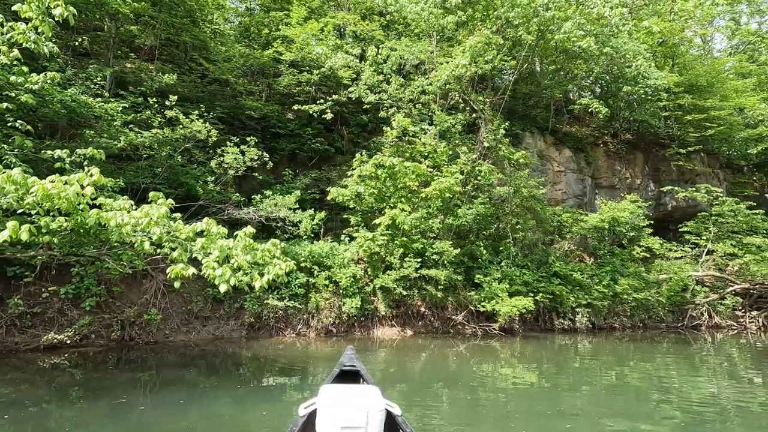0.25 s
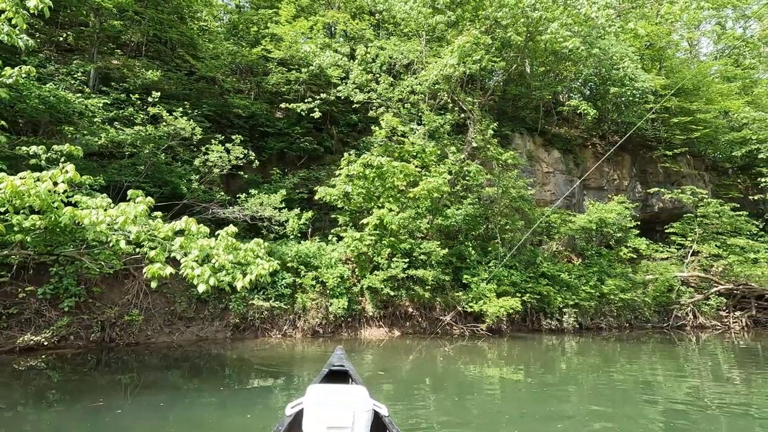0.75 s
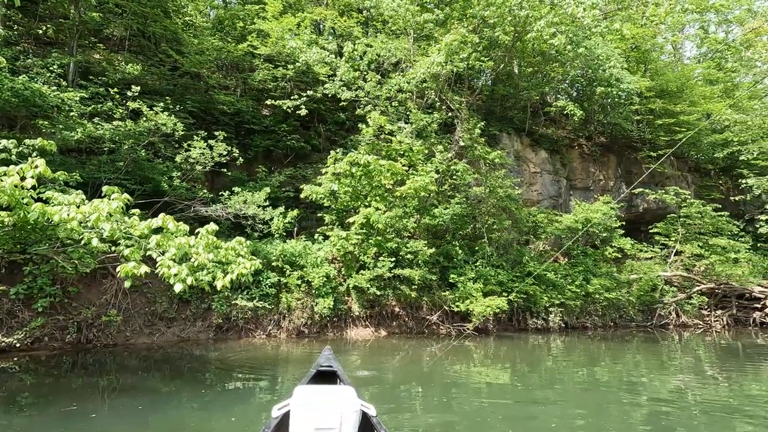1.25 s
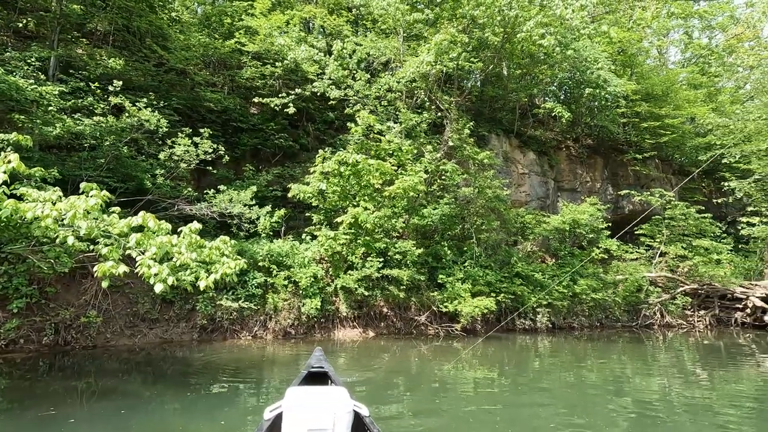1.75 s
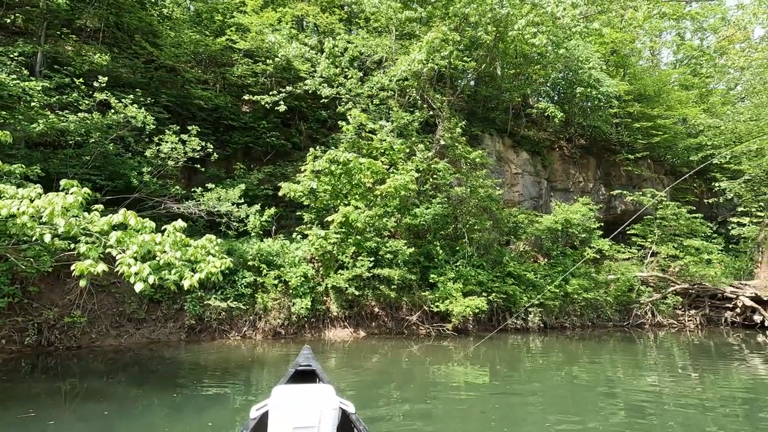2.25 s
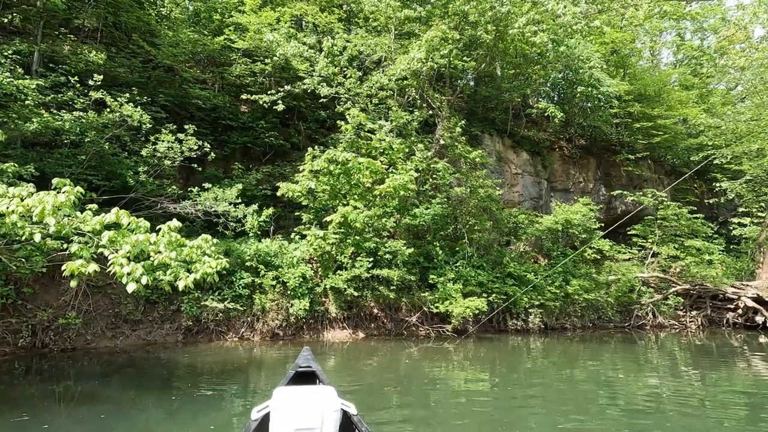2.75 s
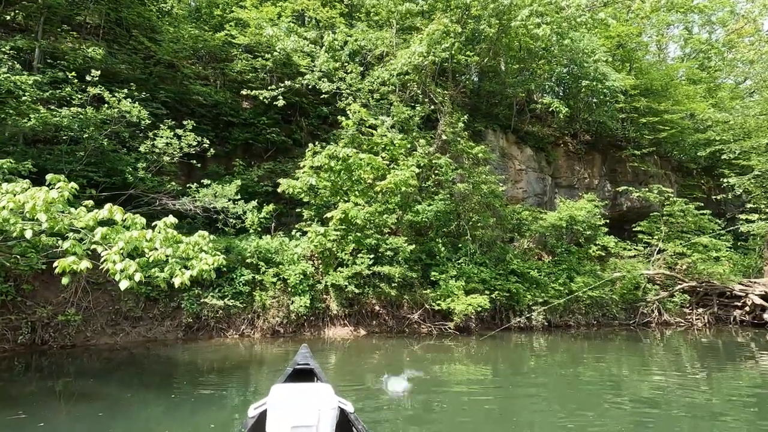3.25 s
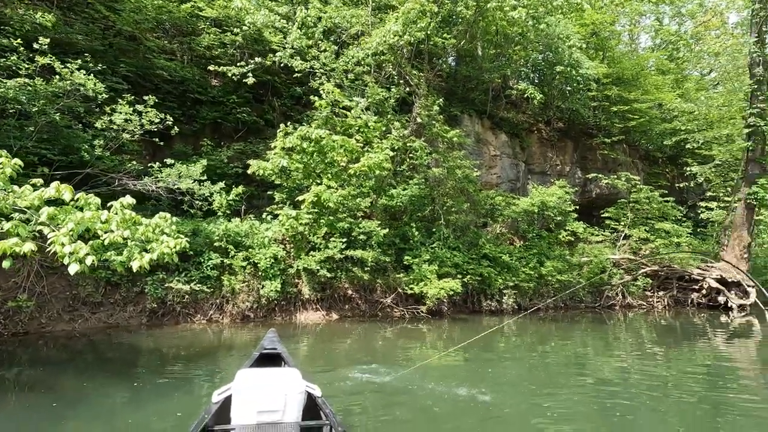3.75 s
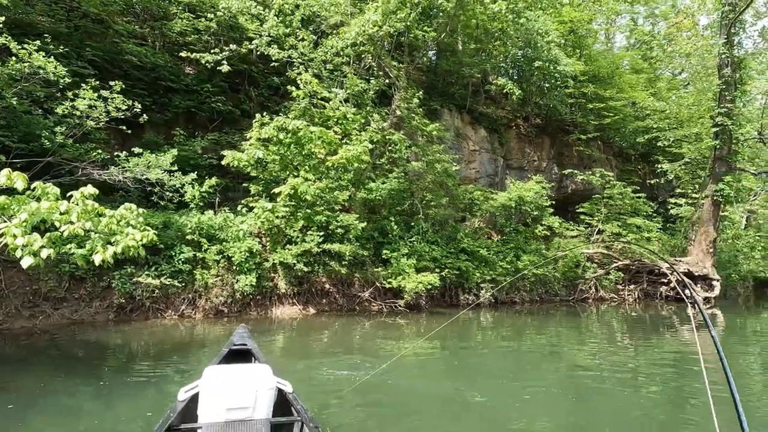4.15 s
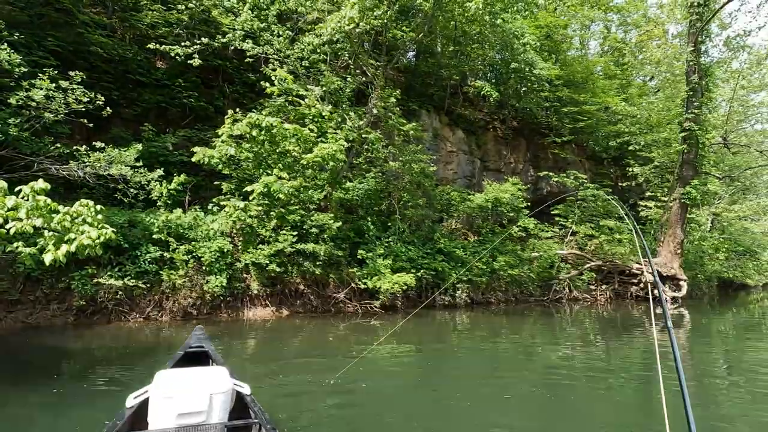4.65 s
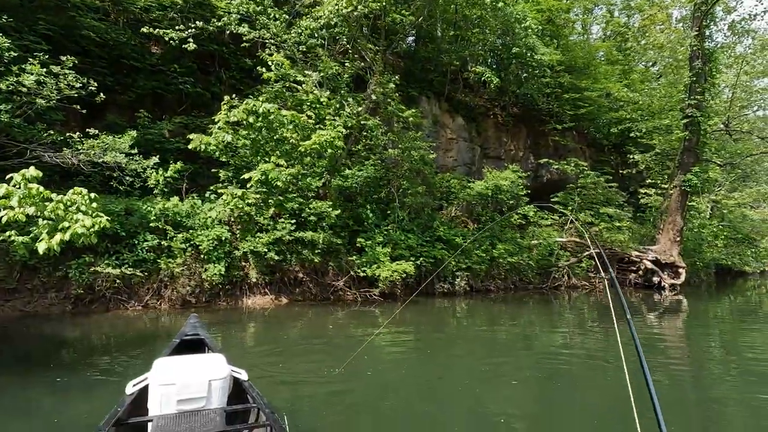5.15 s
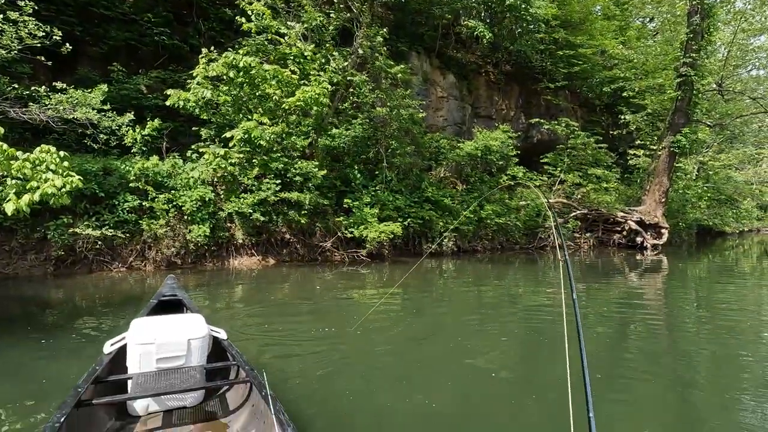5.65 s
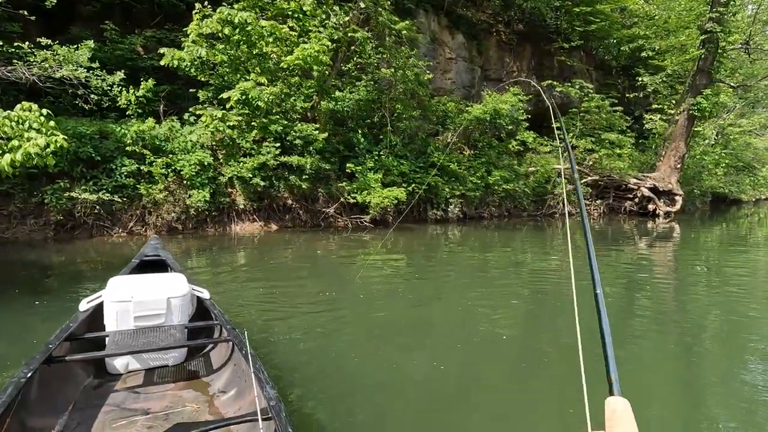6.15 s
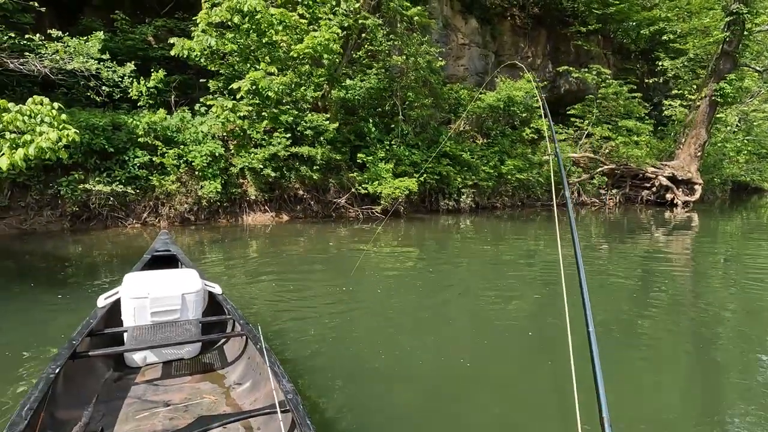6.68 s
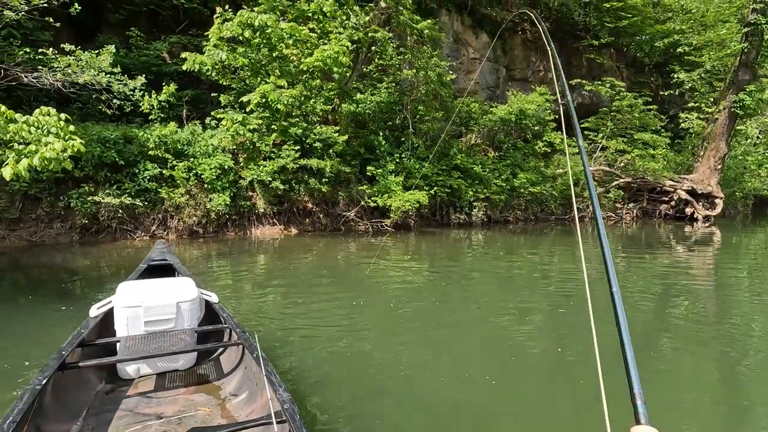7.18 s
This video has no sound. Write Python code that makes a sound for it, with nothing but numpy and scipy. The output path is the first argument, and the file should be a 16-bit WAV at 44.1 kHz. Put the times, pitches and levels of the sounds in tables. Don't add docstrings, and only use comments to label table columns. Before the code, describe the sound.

From a canoe, three sharp line hisses and knocks lead to a brief watery splash, followed by sporadic reel clicking, small metallic tinks and birdsong.

```python
import sys
import numpy as np
from scipy import signal
from scipy.io import wavfile
from scipy.ndimage import uniform_filter1d

SR = 44100
rng = np.random.default_rng(int(sys.argv[2]) if len(sys.argv) > 2 else 0)


def store_wav(level_fs):
    pcm = np.round(np.clip(np.atleast_2d(level_fs), -1, 1) * 32767)
    wavfile.write(sys.argv[1], SR, pcm.T.astype(np.int16))


def gain_from_decibels(decibels):
    exponent = np.asarray(decibels, float) / 20
    return 10 ** exponent


N = 327122

# pitch_hz, likeness
SAME = [(60, 0.25), (180, 1), (510, 0.96), (1510, 0.86), (4420, 0.64), (13000, 0.0685)]
# pitch_hz, left_lead_rad
LEAD = [(0, -0.073), (3450, 0.4), (5170, -0.43), (11200, -0.0), (12300, 0.22), (13100, -0.018)]
# time_s, pitch_hz
STEP_DOWN = [(0, 4650), (.016, 4030), (.03, 4230), (.042, 4150), (.062, 3470), (.12, 3420)]
HOOK = [(0, 2504), (.018, 3800), (.042, 2950), (.06, 2730), (.082, 2690)]
PIP = [(0, 2590), (.015, 2790), (.035, 2758)]
PEEP = [(0, 2480), (0.02, 2644), (0.037, 2600)]
SLUR = [(0, 1895), (.018, 2200), (.045, 1565), (.08, 1560)]
THIN = [(0, 3203.5), (.03, 3125), (.2, 3030)]
DIP = [(0, 2536), (0.018, 2405), (0.049, 2272.5)]
CHIP = [(0, 4300), (.015, 3270)]


def evened(x):
    return x / np.sqrt(np.mean(x ** 2) + 1e-20)


def read(points, hz):
    f, value = np.transpose(points)
    return np.interp(np.log(hz + 1), np.log(f + 1), value)


def curves(rows, off_db=None):
    s, *columns = np.transpose(rows)
    return [np.interp(np.arange(N) / SR, s, c, off_db, off_db) for c in columns]


def swells(rows):
    t = np.arange(N) / SR
    return sum(gain_from_decibels(db) * np.exp(-((t - s) / spread) ** 2) for s, db, spread in rows)


def sides(pan_db):
    return np.array([gain_from_decibels(pan_db / 2), gain_from_decibels(-pan_db / 2)])


def add(mix, s, sound):
    part = mix[..., round(s * SR):][..., :sound.shape[-1]]
    part += sound[..., :part.shape[-1]]


def band(x, lo_hz, hi_hz, order=2):
    return signal.sosfilt(signal.butter(order, [lo_hz, min(hi_hz, .45 * SR)], "band", fs=SR, output="sos"), x)


def around(x, hz, octaves):
    reach = 2 ** (np.clip(octaves, .1, 4) / 2)
    return evened(band(x, hz / reach, hz * reach))


def noise(tone_db, same, lead, patchy_db, flicker_db, size):
    frames, hz = 4 * N // size + 5, np.fft.rfftfreq(size, 1 / SR)
    a, b, c, d, patches = rng.standard_normal((frames, len(hz), 5)).T
    patches = uniform_filter1d(patches, size // 64, 0)
    patches = evened(uniform_filter1d(patches, 8192 // size, 1))
    same = np.clip(same(hz), -1, 1)[:, None]
    left = a + 1j * b
    right = same * left + np.sqrt(1 - same ** 2) * (c + 1j * d)
    right = right * np.exp(-1j * lead(hz))[:, None]
    level_db = tone_db(hz)[:, None] + patchy_db * patches + flicker_db * rng.standard_normal(frames)
    spectra = np.array([left, right]) * gain_from_decibels(level_db)
    return evened(signal.istft(spectra, nperseg=size, noverlap=3 * size // 4)[1][:, :N])


def ring(modes, detune):
    t = np.arange(SR // 6) / SR
    return sum(gain_from_decibels(db - 60 * t / t60) * np.sin(2 * np.pi * hz * detune * t) for hz, db, t60 in modes)


def line():
    # start_s, end_s, fastest_s, level_db, spread_s
    pulls = [
        (.513, .9, .75, -50, .24),
        (1.845, 2.31, 2.12, -50.5, .19),
        (3.025, 3.36, 3.31, -52.5, .23),
        (2.79, 2.98, 2.88, -77, .2),
        (3.43, 3.48, 3.455, -63, .018),
        (3.48, 3.63, 3.55, -69.5, .09),
        (3.648, 3.712, 3.68, -62, .06),
        (3.72, 3.75, 3.733, -63, .025),
    ]
    # pitch_hz, level_db per Hz
    rod_tone = [(240, -64), (400, -16.5), (659, -22), (911, -23), (1020, -23), (1690, 0), (1840, -2.5),
                (2140, -3.5), (3500, 6), (4800, 4), (6720, -9), (9010, -24.5), (11100, -15), (13400, -28)]
    # pitch_hz, width_hz, level_db
    guide_rings = [(2430, 170, -12), (2760, 32, -8), (3460, 43, -2), (3720, 58, 0), (4110, 290, 0),
                   (4840, 54, -3), (5450, 84, -7), (6520, 56, -14)]
    # time_s, low_hiss_db
    slack_line = [(.51, 3), (.6, -5), (.9, -12.5), (1.85, -8), (1.97, -23), (2.3, -22), (3.03, -15.5),
                  (3.14, -12.5), (3.75, -36)]
    split_hz, rings_db = 3200, 6
    rings = lambda hz: sum(1 / (1 + (2 * (hz - f) / (w + 60)) ** 2) for f, w, _ in guide_rings)
    tone = lambda hz: read(rod_tone, hz) + rings_db * np.minimum(rings(hz), 1)
    hiss = noise(tone, lambda hz: 0.88 + 0 * hz, lambda hz: 0.87 + 0 * hz, 2.9, 0.8, size=512)
    low, high = band(hiss, 100, split_hz), band(hiss, split_hz, 27000)
    t = np.arange(N) / SR
    level = np.zeros(N)
    for start, end, fastest, db, spread in pulls:
        level += gain_from_decibels(db - 10 * ((t - fastest) / spread) ** 2) * (t > start) * (t < end)
    level = uniform_filter1d(level, size=500)
    return sides(-2.5)[:, None] * level * (high - gain_from_decibels(curves(slack_line)[0]) * low)


def bending_wave(first_s, stretch, decay_s, spike, ring_db, top_hz):
    t = np.arange(-SR // 60, SR // 15) / SR
    late = np.maximum(t, 0)
    swing = -np.cos(np.pi * np.log1p(late / first_s) / np.log(stretch)) * (t >= 0)
    swing *= np.exp(-late / decay_s) / (1 + late / .003) ** .45
    swing *= 1 + spike * np.exp(-late / .0003)
    ahead = gain_from_decibels(ring_db) * np.sin(2 * np.pi * 165 * t + 3.0) * np.exp(np.minimum(t / 0.0063, -t / 0.0062))
    return signal.lfilter(*signal.butter(2, top_hz, fs=SR), swing + ahead)


def jolts():
    # start_s, peak_db, sharpness_hz
    blows = [
        (1.019, -38.5, 1200),
        (2.1086, -20, 9000),
        (2.7112, -30.5, 8900),
        (3.3591, -14, 15000),
    ]
    out = np.zeros((2, N))
    tick = 1.3 * bending_wave(0.00033, 2.25, 0.0004, 0, -41, 4430)
    push = 0.97 * bending_wave(0.0046, 7.5, 0.015, 0, -28, 360)
    right = 1.26 * bending_wave(0.00023, 2.59, 0.0034, -0.85, -16, 2700)
    left = np.roll(tick, 9) + np.roll(push, 45)
    shock = np.array([left, right])
    for s, db, sharp_hz in blows:
        softened = signal.lfilter(*signal.butter(1, min(sharp_hz, .45 * SR), fs=SR), shock)
        add(out, s - 1 / 60 - .00015, gain_from_decibels(db) * softened)
    return out


def scuffs():
    # start_s, peak_db, centre_hz, spread_octaves
    rubs = [(0.101, -57.5, 6500, 0.27), (0.445, -51, 4080, 1.6), (0.4653, -49.5, 3820, 0.99),
            (0.9175, -41, 4400, 0.53), (0.938, -47, 7000, 1.6), (0.955, -38, 3500, 1.2),
            (0.9715, -35.5, 3870, 0.53), (1.873, -55, 4230, 1.9), (2.669, -48.5, 5200, 0.25),
            (3.0264, -66, 4840, 0.55), (3.5917, -50, 5150, 1.2), (3.7985, -56, 3640, 0.79),
            (3.896, -65, 4050, 1.1), (3.925, -67, 5000, 1.7), (4.0287, -64, 4190, 0.69),
            (5.2856, -51, 4000, 0.44), (5.477, -68, 4090, 2), (5.512, -56, 4000, 0.98),
            (5.8724, -59.5, 4360, 2.1), (5.8894, -72, 3900, 1.5), (5.9514, -74, 4500, 1.1),
            (6.151, -62, 4400, 2.1), (6.2476, -44.5, 4130, 0.21), (6.508, -45, 4940, 0.27),
            (6.5262, -54, 3480, 3), (4.8415, -37, 2530, 0.29), (6.6069, -62, 4800, 0.96),
            (3.302, -31.5, 1940, 1.4), (3.334, -32, 1700, 1.6), (3.342, -40.5, 2400, 1.2),
            (3.488, -60.5, 3000, .6), (3.539, -52, 2900, 0.76), (3.57, -60, 2800, 0.91),
            (3.585, -57, 3100, .5), (3.606, -58, 3100, .5), (3.664, -47, 2400, 0.91),
            (2.355, -60, 2200, 1.6), (0.986, -49, 3780, .8)]
    out = np.zeros((2, N))
    t = np.arange(SR // 12) / SR
    for s, db, hz, octaves in rubs:
        grit = around(rng.standard_normal(len(t)), hz, octaves)
        fade = gain_from_decibels(db - 12.5 - 60 * t / 0.022) * np.minimum(t / 0.0022, 1)
        add(out, s, sides(-8.5)[:, None] * grit * fade)
    return out


def pawl_times():
    # start_s, stop_s, push_s, top_teeth_per_s, peak_db
    runs = [(4.8424, 5.08, 0.002, 105.1, -54), (5.1654, 5.275, .0236, 93, -59.5),
            (5.5073, 5.51, 0, 40, -50), (6.945, 6.95, 0, 40, -58), (5.8678, 5.93, 0, 60, -63),
            (6.1794, 6.4, .0239, 71.3, -57), (6.5108, 6.515, .05, 40, -58),
            (6.6188, 6.9, .0507, 88.6, -58.5), (6.963, 7.2, .001, 99.8, -55), (7.349, 7.35, 0, 40, -57),
            (7.3675, 7.42, .06, 108, -55.5)]
    coast_s, spin_up_s, slack = .1936, .0041, .916
    slow_db = 10
    first_db, build_s = -9, .012
    uneven_s, uneven_db = .0006, 2.8
    rows = []
    for start, stop, push, per_s, db in runs:
        t = np.arange(0, stop - start, 1 / SR)
        speed = (1 - slack * np.exp(-t / spin_up_s)) * np.exp(-np.maximum(t - push, 0) / coast_s)
        teeth = np.cumsum(per_s * speed) / SR
        at = np.interp(np.arange(int(teeth[-1]) + 1), teeth, t)
        wobble = rng.standard_normal((len(at), 2))
        halvings = np.maximum(at - push, 0) / coast_s / np.log(2)
        level_db = db - slow_db * halvings + first_db * np.exp(-at / build_s)
        times = start + at + uneven_s * wobble[:, 0] * (at > 1 / SR)
        rows += zip(times, level_db + uneven_db * wobble[:, 1])
    return rows


def reel():
    # pitch_hz, level_db, t60_s
    spool = [(808, -11, 0.028), (1200, -9, 0.018), (2010, -4, 0.049), (2167, -20.5, 0.25),
             (2735, 2.5, 0.04), (3480, -45, .03)]
    # centre_hz, spread_octaves, level_db
    tooth_rasp = [(2200, 1, 0), (4300, 0.46, -16), (5700, 0.12, -0.5), (9300, .15, 1.5),
                  (12200, 0.27, -1.5)]
    out = np.zeros(N)
    t = np.arange(SR // 12) / SR
    strikes = pawl_times()
    gaps = np.diff(np.transpose(strikes)[0], append=N / SR)
    for (s, db), gap in zip(strikes, gaps):
        grit = rng.standard_normal(len(t))
        rasp_db = -10 - 9 * np.log2(np.clip(gap, .011, .03) / 0.0075)
        rasp = sum(gain_from_decibels(g) * around(grit, hz, octaves) for hz, octaves, g in tooth_rasp)
        rasp = rasp * gain_from_decibels(rasp_db - 60 * t / 0.014)
        body = ring(spool, 1 + 0.011 * rng.standard_normal())[:len(t)]
        body = body * (1 + 0.24 * around(grit, 460, 2.56))
        add(out, s, gain_from_decibels(db) * (body + rasp) * np.minimum(t / 0.001, 1))
    return out


def palm():
    # peak_s, level_db, spread_s
    drags = [(4.87, -79, .06), (5.2, -93, .03), (5.285, -80.5, 0.017), (6.2, -79, 0.024),
             (6.265, -75.5, 0.028), (6.53, -73.5, .015), (6.62, -79, 0.014), (6.71, -81, 0.015),
             (7.03, -76, 0.027), (7.39, -86, 0.028)]
    # centre_hz, spread_octaves, level_db
    rim = [(1520, 0.99, 1.5), (4000, 0.52, -4.5), (9400, 0.25, -7), (12800, 0.27, -12)]
    skin = rng.standard_normal(N)
    return swells(drags) * sum(gain_from_decibels(g) * around(skin, hz, octaves) for hz, octaves, g in rim)


def fitting():
    # start_s, upper_peak_db, low_above_upper_db
    knocks = [(0.9357, -59, -2.5), (1.717, -79, -5), (2.8406, -67.5, -13), (4.953, -68.5, -13),
              (5.277, -68, -22), (6.241, -65, -14), (6.2482, -60, -34), (6.263, -71, -20),
              (6.2756, -48, -25), (6.5116, -71, -26), (6.6074, -74, -33), (6.705, -65, -20),
              (6.7294, -65.5, -16), (7.0414, -61, -28), (7.054, -74.5, -6), (5.289, -66, -19)]
    # pitch_hz, level_db, t60_s
    upper = [(11600, 0, .09), (11665, -4, .07), (12370, -7, .07)]
    lower = [(7200, 0, .13), (3700, -10, .15)]
    out = np.zeros(N)
    soft = np.minimum(np.arange(SR // 6) / SR / 0.001, 1)
    for s, db, low_db in knocks:
        add(out, s, gain_from_decibels(db - 7) * (ring(upper, 1) + gain_from_decibels(low_db + 9) * ring(lower, 1)) * soft)
    return out


def bubble(hz, t60, rise):
    t = np.arange(round(min(t60, .1) * SR) + 99) / SR
    turns = np.cumsum(hz * 2 ** (rise * t * (1 + t / 0.033))) / SR
    fade = gain_from_decibels(-60 * t / np.clip(t60, .004, .12)) * np.minimum(t / .001, 1)
    return np.sin(2 * np.pi * turns) * fade


def water():
    # start_s, peak_db, pitch_hz, t60_s
    drips = [(1.05, -37.5, 1030, 0.0084), (1.202, -62.5, 970, 0.096), (1.299, -51.5, 1023, 0.012),
             (2.672, -59, 1940, 0.041), (3.301, -29, 1340, 0.017), (3.308, -29.5, 1170, 0.021),
             (3.315, -52, 1190, 0.015), (3.326, -43, 1130, 0.017), (3.333, -30, 1120, 0.018),
             (3.34, -39, 1050, 0.0024), (5.475, -66.5, 832, 0.14), (5.512, -40.5, 1390, 0.0047),
             (5.96, -59.5, 700, 0.036), (2.356, -53, 1054, 0.14), (2.811, -58.5, 1730, 0.064),
             (2.898, -58, 2010, 0.041), (3.384, -46, 980, 0.044), (3.417, -48.5, 870, 0.045),
             (3.46, -52.5, 893, 0.082), (3.586, -48, 1250, 0.04), (3.803, -63, 1345, 0.054),
             (3.839, -62, 1330, 0.031), (1.2, -57.5, 2120, 0.024), (3.6, -62, 484, 0.078),
             (3.76, -63, 2340, 0.027), (3.775, -61, 2980, 0.02), (3.895, -67, 2010, 0.029),
             (3.905, -68, 3250, 0.041),
             (3.428, -49.5, 1240, .03), (3.504, -65, 1000, 0.023), (3.538, -57, 720, .03),
               (3.547, -52, 1200, 0.032), (3.563, -58, 1900, 0.046), (3.58, -54.5, 394, 0.065),
               (3.663, -54.5, 1060, .04), (3.72, -61, 1210, 0.057), (3.764, -63, 1140, 0.027),
               (1.32, -65, 2070, 0.046), (1.365, -62, 2020, 0.033), (1.398, -63, 1860, .025),
               (1.562, -61, 1560, .04), (1.718, -68, 1920, .08), (2.84, -68, 1950, 0.068)]
    # time_s, level_db
    churn = [(3.29, -92), (3.3, -42.5), (3.325, -54), (3.335, -41.5), (3.35, -43), (3.37, -71), (3.45, -76),
             (3.58, -60.5), (3.65, -71.5), (3.8, -88), (3.96, -93)]
    out, swarm = np.zeros(N), np.zeros(N)
    for s, db, hz, t60 in drips:
        add(out, s, gain_from_decibels(db) * bubble(hz, t60, 2.3))
    for place, pitch, size in rng.random((900, 3)):
        hz = 600 * 2 ** (3.0 * pitch ** 1.3)
        add(swarm, 3.29 + 0.66 * place, size ** 3 * bubble(hz, 18 / hz, 20) * (1000 / hz) ** .6)
    swarm /= np.sqrt(np.mean(swarm[swarm != 0] ** 2))
    specks = rng.standard_normal(N) * gain_from_decibels(1.7 * np.minimum(rng.exponential(1, N), 4))
    specks *= rng.random(N) < 3000 / SR
    swarm += gain_from_decibels(-0.5) * around(specks, 1200, 2.0)
    return (out + gain_from_decibels(curves(churn, -200)[0] - 6) * swarm) * sides(-1.5)[:, None]


def birds():
    # (pitch path, offset_s, level_db) per note, then (start_s, level_db) per singing
    phrases = [
        ([(HOOK, 0, 0), (STEP_DOWN, 0.086, -0.32)], [(.909, -75.5), (1.235, -70.5), (1.54, -67.5), (1.84, -63), (2.432, -68)]),
        ([(CHIP, -0.034, -6), (PIP, 0, 0), (THIN, 0.027, -9), (DIP, 0.07, -1.5), (PEEP, 0.15, 6), (SLUR, 0.2, -5.5)], [(3.85, -75), (4.27, -73), (4.68, -73), (5.087, -71.5)]),
        ([([(0, 885), (.02, 1608), (.035, 2529)], 0, 0)], [(3.985, -69.5)]),
        ([([(0, 3051.5), (.025, 3099.5), (.042, 4302)], 0, 0), ([(0, 4449), (.025, 3097), (.065, 2392), (.097, 2748)], .065, 0)], [(.22, -81.5)]),
        ([([(0, 2507.5), (.04, 3289), (.1, 2300)], 0, 0)], [(2.91, -78.5)]),
        ([([(0, 3054), (.035, 2395)], 0, 0)], [(1.675, -75), (1.735, -84), (1.782, -74)]),
        ([(PEEP, 0, 0), ([(0, 2134), (.06, 2016)], 0, -0.98), ([(0, 2998.5), (.05, 3012)], .04, -1.6), (PEEP, 0.064, -2.3)], [(0.0, -77)]),
    ]
    out = np.zeros(N)
    for phrase, times in phrases:
        for path, offset, note_db in phrase:
            s, hz = np.transpose(path)
            t = np.arange(0, s[-1], 1 / SR)
            pitch = uniform_filter1d(np.interp(t, s, hz), size=120, mode="nearest")
            waver = evened(uniform_filter1d(rng.standard_normal(len(t)), size=150))
            pitch *= 1 + .007 * waver
            note = np.sin(2 * np.pi * np.cumsum(pitch) / SR) * signal.windows.tukey(len(t), .35)
            for start, db in times:
                add(out, start + offset, gain_from_decibels(db + note_db + 0.5) * note)
    t = np.arange(SR) / SR
    echo = rng.standard_normal((2, SR)) * gain_from_decibels(-60 * t / 1.1) * (t > .012)
    echo = signal.fftconvolve(out[None], echo / np.linalg.norm(echo[0]), axes=1)[:, :N]
    return out * sides(-2.0)[:, None] + gain_from_decibels(0.5) * echo


def hull():
    # peak_s, level_db, spread_s
    groans = [
        (1.02, -57, 0.022),
        (1.93, -60, 0.024),
        (2.33, -87, 0.018),
        (4.2, -62.5, 0.038),
        (5.97, -60.5, 0.023),
        (7.06, -66.5, 0.094),
    ]
    return swells(groans) * evened(band(rng.standard_normal(N), 100, 226))


def river():
    # time_s, level_db
    flow = [(0.0, -78.5), (0.47, -78), (0.72, -64.5), (0.89, -65), (1.03, -87), (1.24, -78), (1.36, -75.5),
            (2.11, -73), (3.06, -81), (3.49, -66.5), (3.8, -78.5), (4.83, -86), (5.04, -78.5), (5.87, -83),
            (6.01, -88), (6.49, -83.5), (7.31, -87), (7.42, -101)]
    # pitch_hz, level_db per Hz
    flow_tone = [(240, -33.5), (400, 1), (499, -14.5), (720, -3), (911, -14), (1020, 0.5), (1740, -4.5),
                 (3080, -6), (6520, -24.5), (13400, -34)]
    # peak_s, level_db, spread_s
    wavelets = [(.05, -77, 0.065), (.8, -68, 0.25), (1.38, -69.5, 0.13), (1.9, -73, 0.089),
                (2.5, -74.5, 0.38), (3.53, -63, 0.18), (4.27, -74, 0.15), (5.03, -76.5, 0.14),
                (5.501, -76, 0.024), (5.75, -73.5, 0.23), (5.97, -84, 0.016), (6.45, -81.5, 0.17),
                (7.05, -75.5, 0.054)]
    level_db, = curves(flow)
    wide_db, mono_db = 2.5, -2.5
    treble_db = mono_db + (wide_db - mono_db) * folded() - 0.12 * (level_db + 83.5)
    same, lead = (lambda hz: read(SAME, hz)), (lambda hz: read(LEAD, hz))
    wash = noise(lambda hz: read(flow_tone, hz), same, lead, 2.3, 1.2, size=512)
    body = band(wash, 1100, 3600, order=3)
    far = body + gain_from_decibels(treble_db) * band(wash, 3600, 16000, order=3)
    laps = gain_from_decibels(-99.5) + swells(wavelets)
    lapping = gain_from_decibels(-3.0) * laps * evened(band(wash, 290, 970, order=3))
    return gain_from_decibels(level_db + 1.0) * far / body.std() + lapping


def drone():
    # pitch_hz, width_hz, level_db
    murmur = [(161.5, 15, 6), (206, 153, -10.5)]
    # time_s, level_db
    drone_level = [(0.0, -71), (2.07, -75), (3.7, -65.5), (4.44, -75), (5.52, -70.5), (6.4, -77.5),
                   (7.02, -77.5), (7.42, -76)]
    humps = lambda hz: sum(gain_from_decibels(db) / (1 + (2 * (hz - f) / w) ** 2) for f, w, db in murmur)
    same, lead = (lambda hz: read(SAME, hz)), (lambda hz: read(LEAD, hz))
    low = noise(lambda hz: 20 * np.log10(humps(hz)), same, lead, 1.6, 1.5, size=1024)
    return gain_from_decibels(curves(drone_level)[0] + 2.5) * low


def wind():
    # time_s, gust_db
    gust_points = [(0, -47.5), (.23, -55.5), (.68, -47), (.85, -45.5), (1.1, -50.5), (1.6, -55.5),
                   (2.02, -54), (2.29, -44), (2.6, -56), (2.8, -58), (3.1, -49), (3.45, -55.5),
                   (4.36, -61.5), (4.92, -57.5), (5.6, -57.5), (6.03, -49.5), (6.36, -58), (7.42, -53.5)]
    gust_db, = curves(gust_points)
    buffet_db = -27.5 + 1.47 * (gust_db + 61)
    a, b, lumps = rng.standard_normal((3, 2, N))
    lumps = gain_from_decibels(2.5 * evened(band(lumps, 3, 14, order=1)))
    rumble = evened(band(a + 0.014 * a[::-1], 7.47, 34.1, order=4))
    buffets = evened(band(b + 2.9 * b[::-1], 23, 85))
    return gain_from_decibels(gust_db) * sides(0.47)[:, None] * lumps * (rumble + gain_from_decibels(buffet_db - 6.5) * buffets)


def folded():
    fold_s, fold_len_s = 3.81, 0.6
    return np.clip((fold_s - np.arange(N) / SR) / fold_len_s + .5, .02, 1)


def scene():
    tackle = jolts() + scuffs() + reel() + palm() + fitting()
    return line() + tackle + water() + birds() + hull() + river() + drone() + wind()


def roll_off(x):
    return signal.sosfilt(signal.butter(12, 15700, fs=SR, output="sos"), x)


def record(dry):
    t = np.arange(N) / SR
    width = folded()
    mid, side = (dry[0] + dry[1]) / 2, (dry[0] - dry[1]) / 2
    gusts = signal.sosfiltfilt(signal.butter(2, 70, fs=SR, output="sos"), side)
    gusty = np.exp(-((t - 6.0) / 0.063) ** 2)
    side = width * side + (1 - width) * gusty * gusts
    x = np.array([mid + side, mid - side])
    dull = signal.oaconvolve(x, signal.firwin(255, 13550, fs=SR)[None], "same")
    x = width * dull + (1 - width) * x
    gap_s, gap_end_s, gap_fade_s = 7.201, 7.264, .06
    gate = np.clip((gap_s - t) / 0.0005, 0, 1) + np.clip((t - gap_end_s) / gap_fade_s, 0, 1)
    mix = signal.sosfilt(signal.butter(2, 12, "high", fs=SR, output="sos"), x) * gate
    return roll_off(mix)


dry = scene()
out = record(dry)
store_wav(out)
```